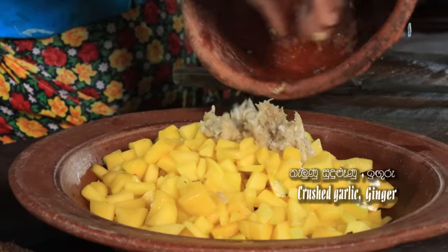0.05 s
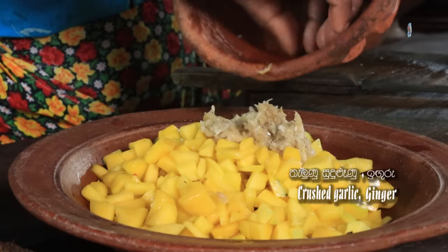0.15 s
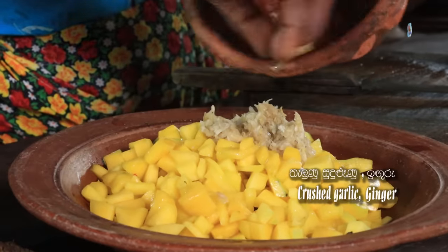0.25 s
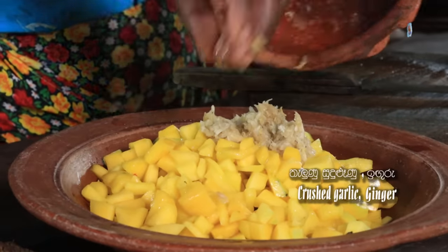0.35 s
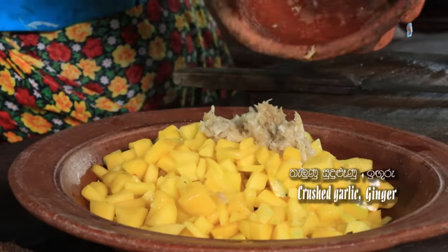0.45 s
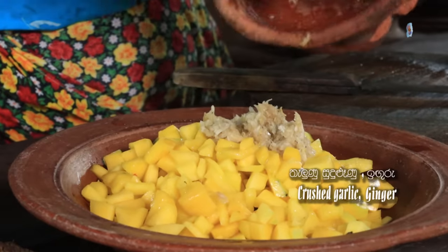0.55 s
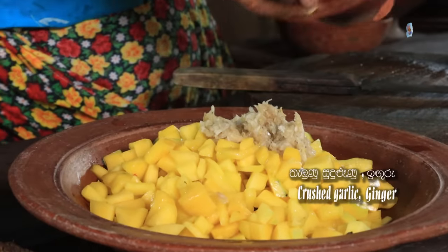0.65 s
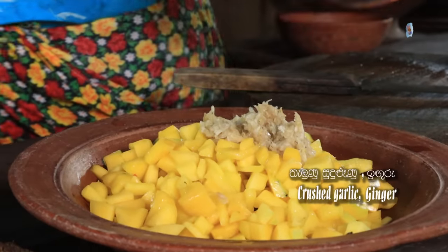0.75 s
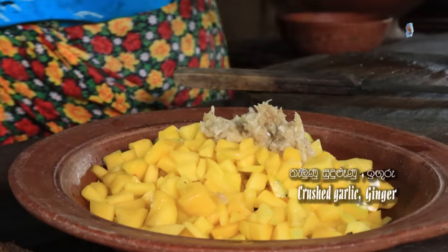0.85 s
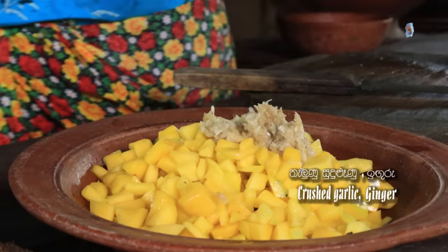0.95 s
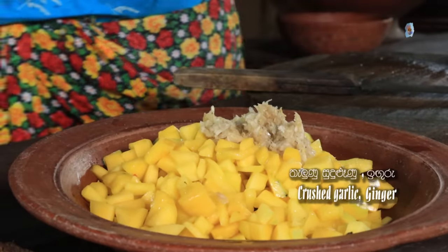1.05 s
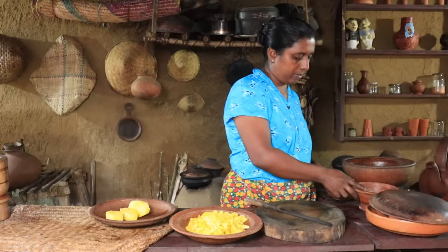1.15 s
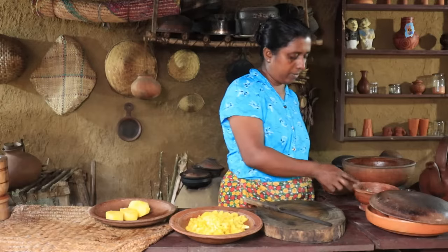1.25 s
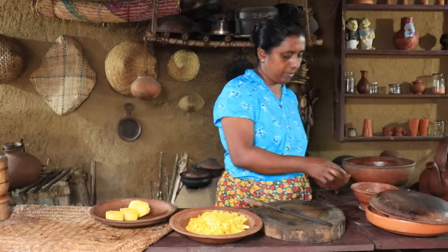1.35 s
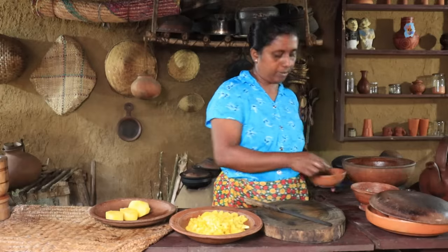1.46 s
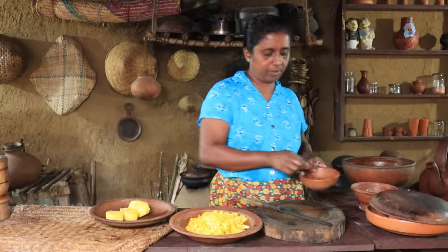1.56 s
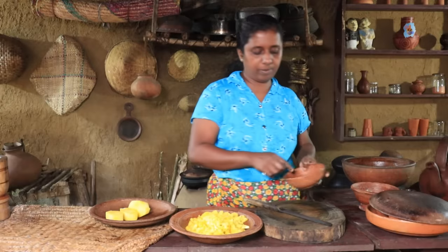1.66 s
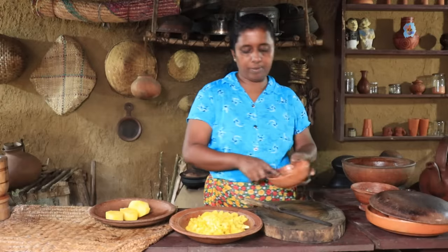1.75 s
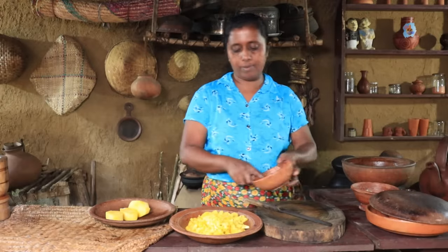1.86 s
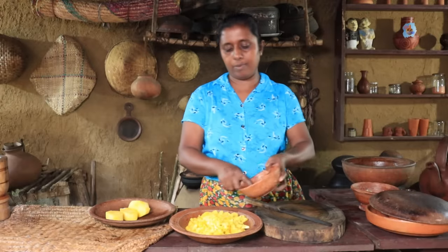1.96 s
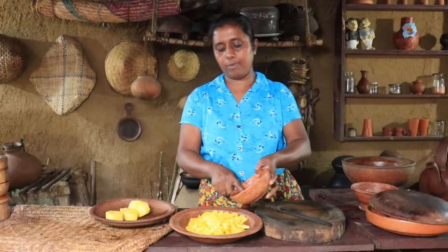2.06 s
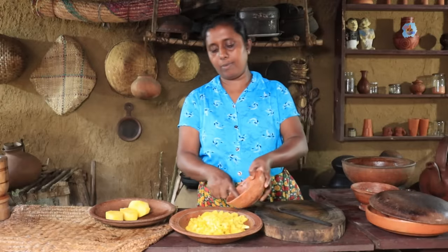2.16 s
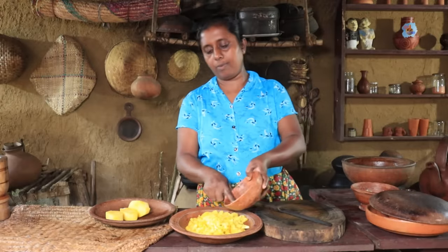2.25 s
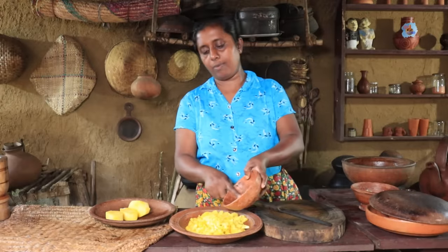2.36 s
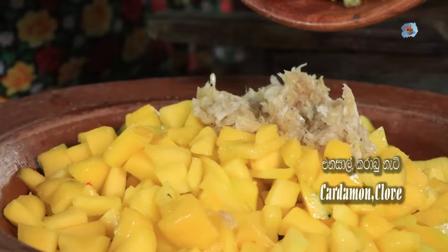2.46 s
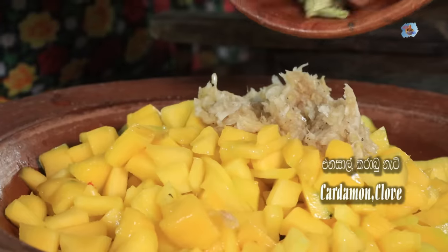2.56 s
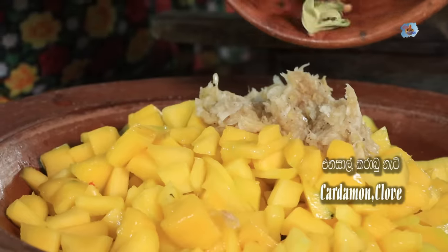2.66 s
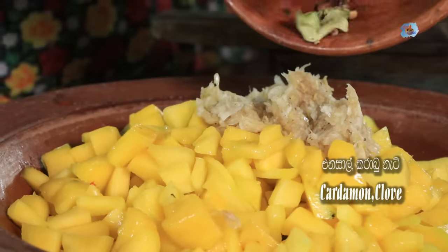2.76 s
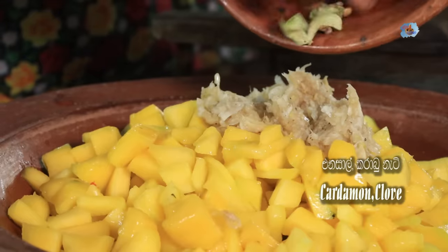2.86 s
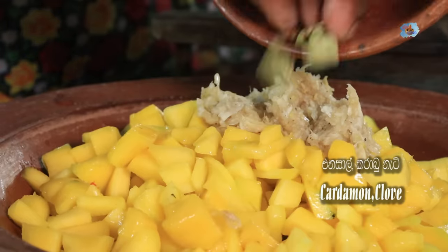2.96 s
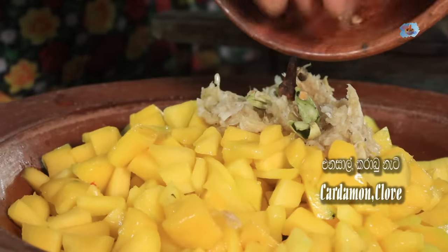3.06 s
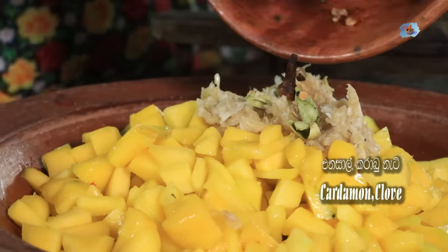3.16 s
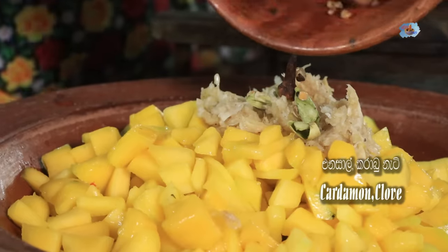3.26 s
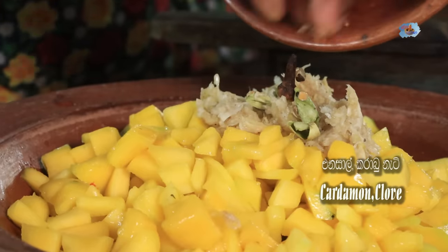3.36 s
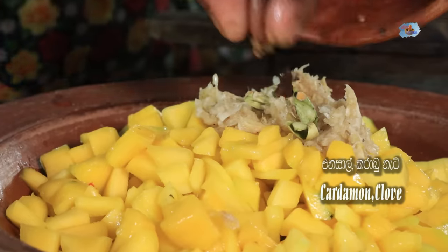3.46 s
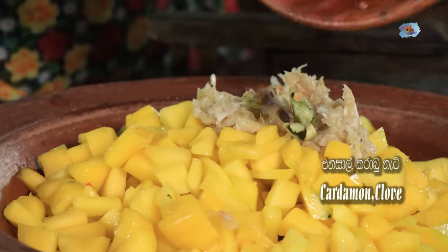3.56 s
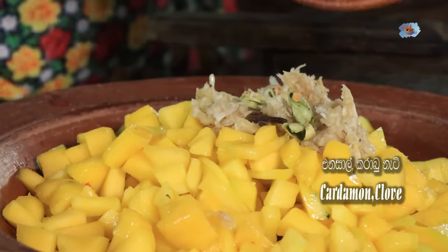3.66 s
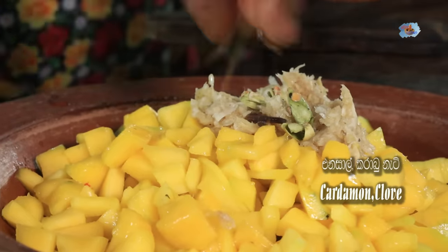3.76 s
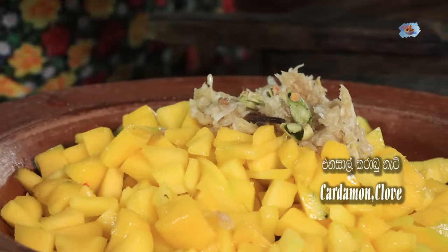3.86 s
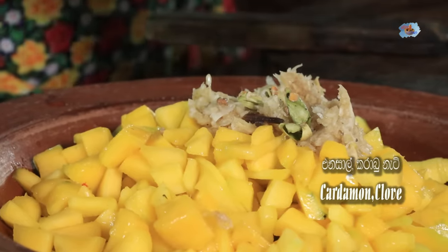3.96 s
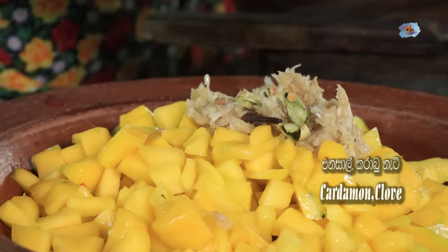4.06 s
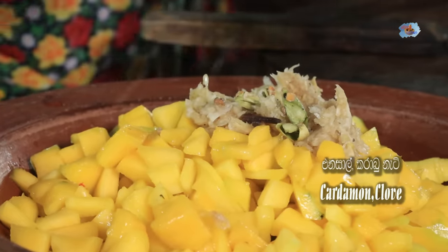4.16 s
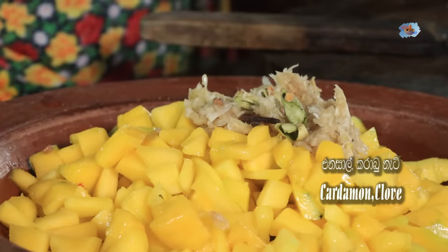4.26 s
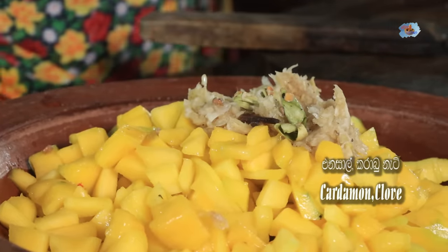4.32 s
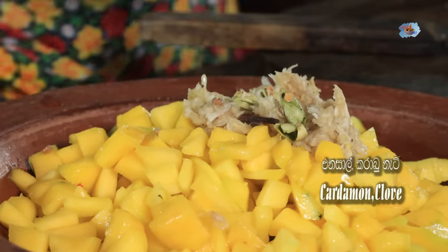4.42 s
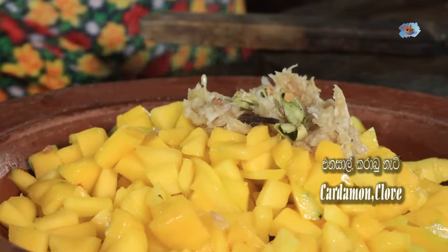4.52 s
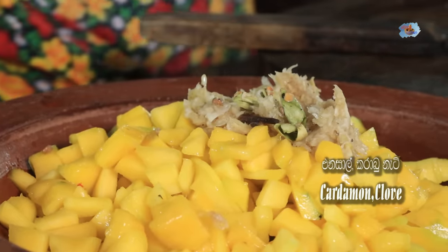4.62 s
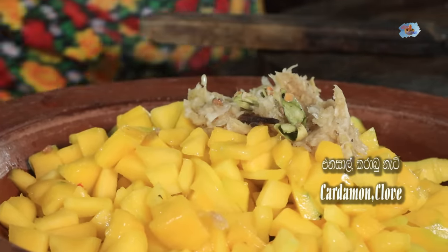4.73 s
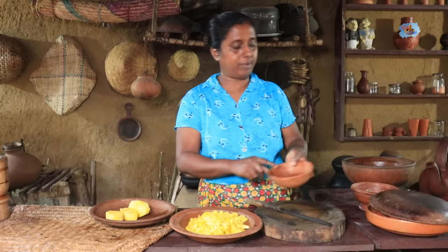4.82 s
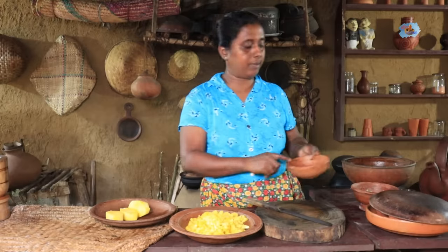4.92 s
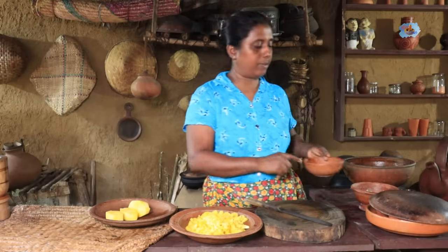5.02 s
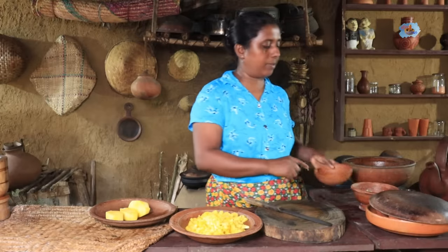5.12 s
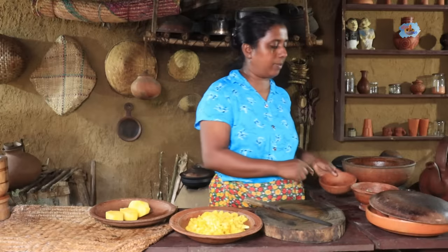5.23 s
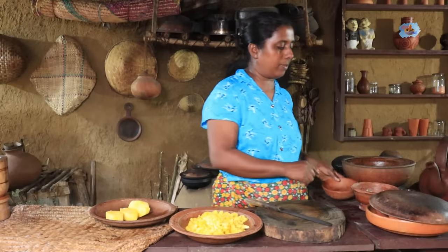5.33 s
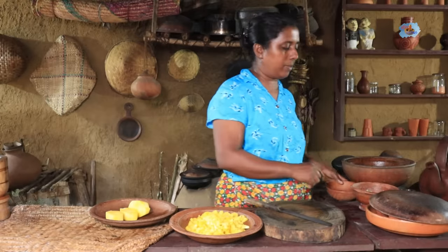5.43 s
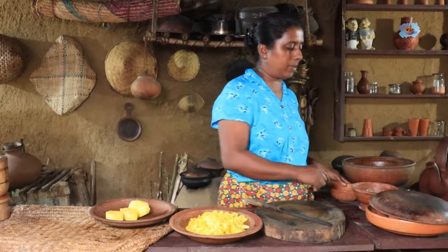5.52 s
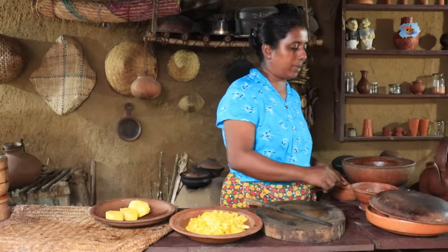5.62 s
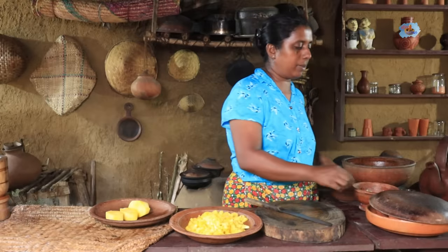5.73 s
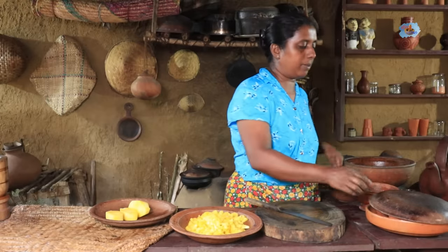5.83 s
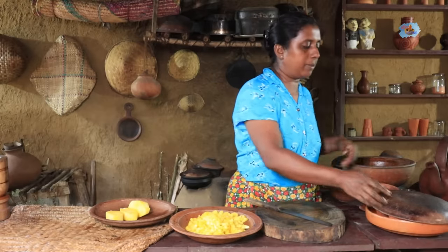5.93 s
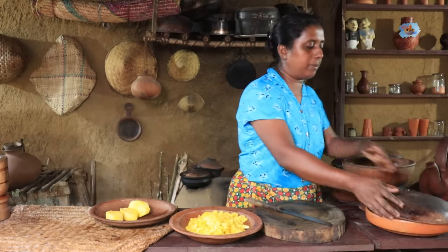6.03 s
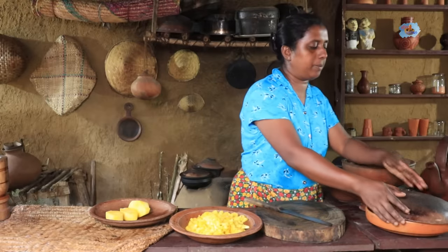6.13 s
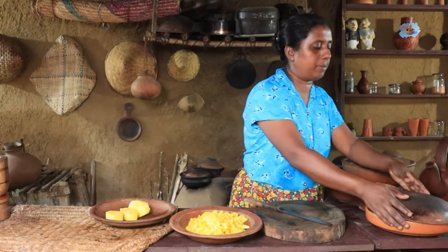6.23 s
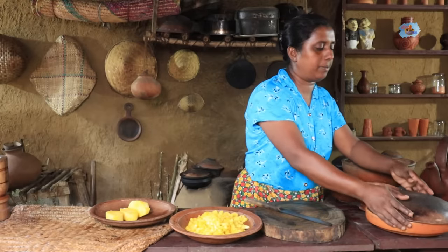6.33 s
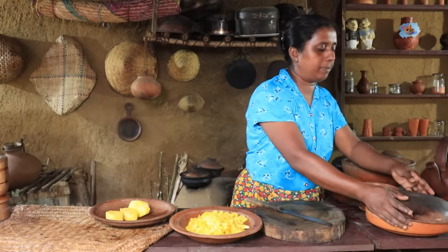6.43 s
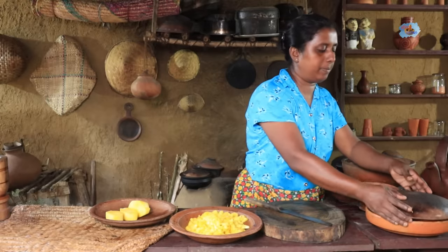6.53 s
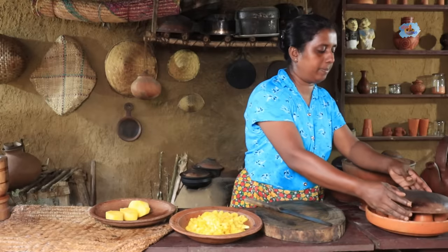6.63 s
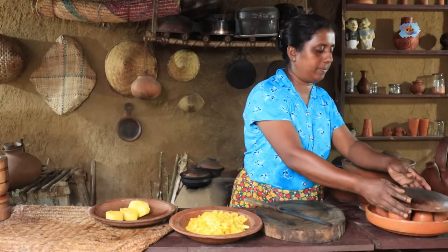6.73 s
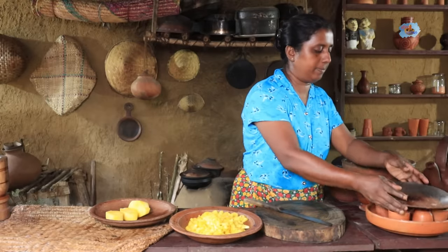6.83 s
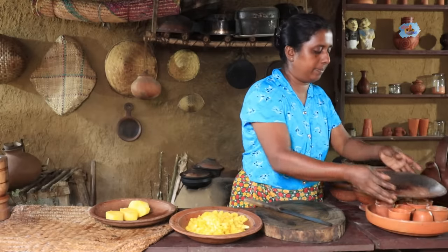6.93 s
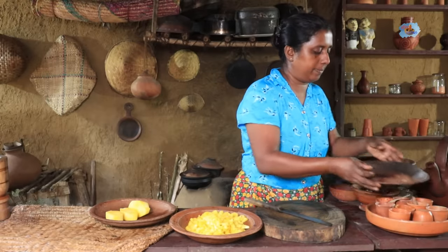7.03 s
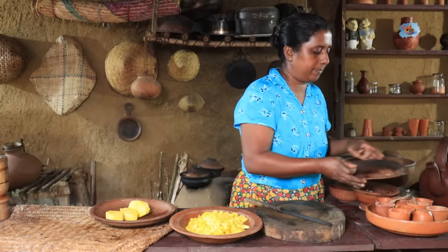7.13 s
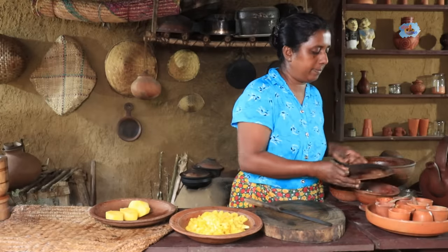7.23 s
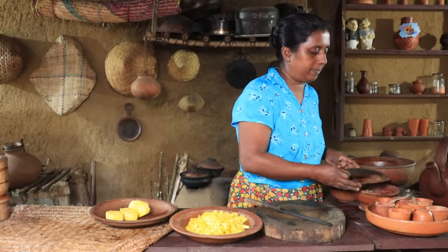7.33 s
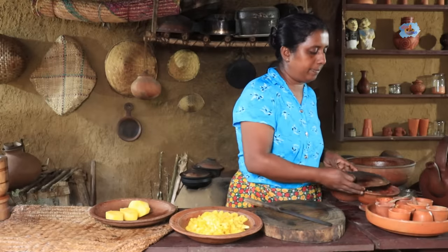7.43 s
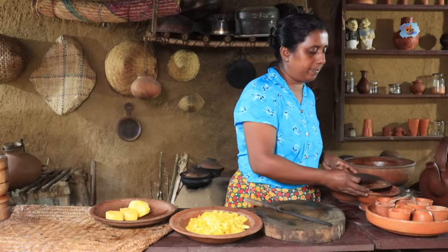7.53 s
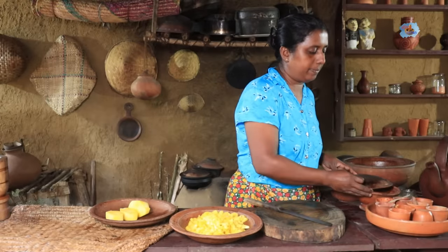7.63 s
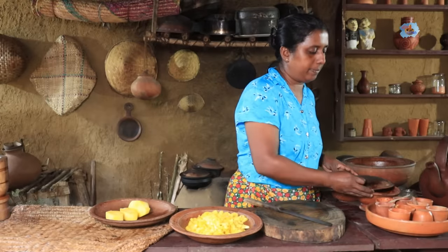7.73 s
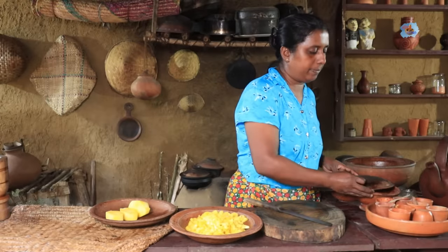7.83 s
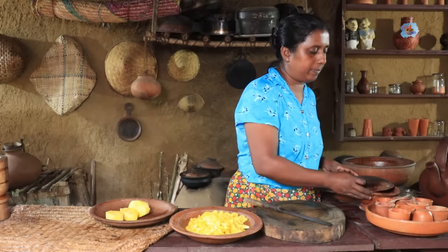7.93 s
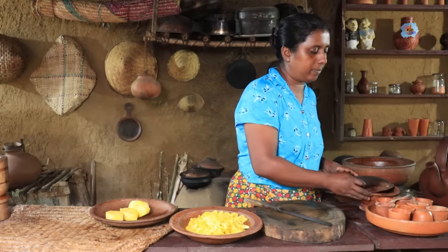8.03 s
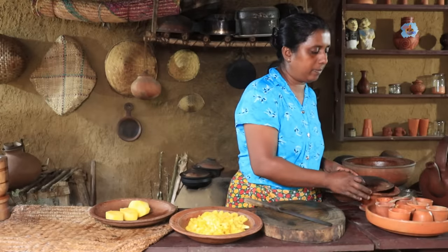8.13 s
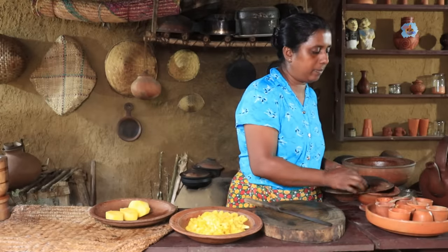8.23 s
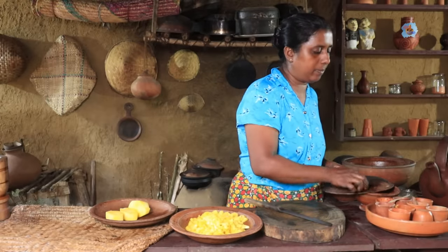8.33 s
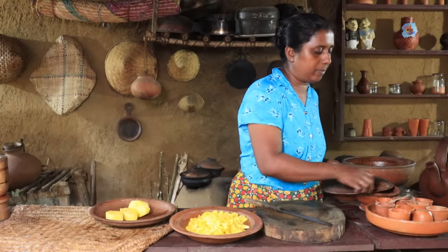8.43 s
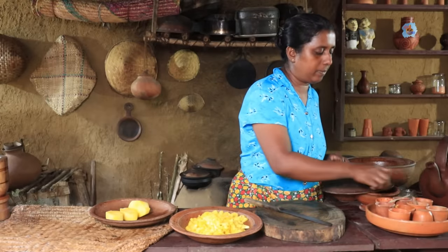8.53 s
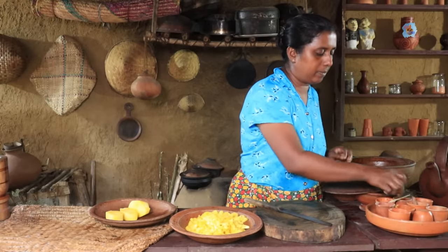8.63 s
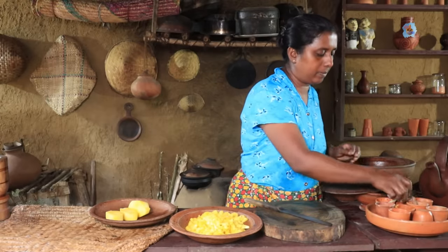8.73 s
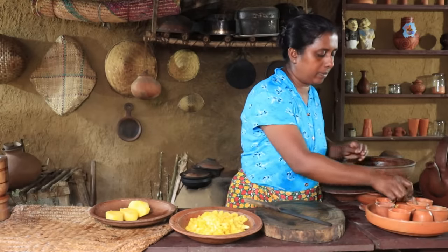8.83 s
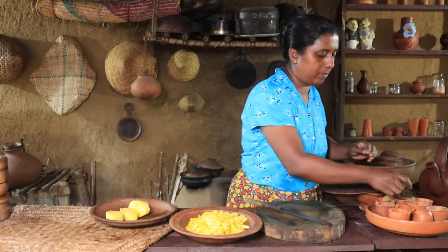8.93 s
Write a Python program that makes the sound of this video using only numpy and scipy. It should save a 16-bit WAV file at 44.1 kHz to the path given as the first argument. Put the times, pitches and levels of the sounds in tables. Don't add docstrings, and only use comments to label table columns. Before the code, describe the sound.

Very quiet dry rubs, grit and tiny bright clicks of clay come first, with distant bird whistles. Past the middle, loud hollow double knocks of a bowl being set down, a short rattling lid removal, a pause, then the lid lands edge first and drops flat. A loud nearby chirp on the left just precedes the landing. Small room with short echo, soft insect band and motor hum, close spaced microphones.

```python
import sys
import numpy as np
from scipy import signal
from scipy.fft import rfft, irfft, next_fast_len
from scipy.io import wavfile
from scipy.ndimage import map_coordinates

SR = 44100
rng = np.random.default_rng(int(sys.argv[2]) if len(sys.argv) > 2 else 0)


def pcm_store(signal):
    levels = np.round(np.clip(np.atleast_2d(signal), -1, 1) * 32767)
    wavfile.write(sys.argv[1], SR, levels.astype(np.int16).T)


def gain_from_db(level_db):
    decades = np.asarray(level_db, float) / 20
    return 10 ** decades


N = 396018
TIME = np.arange(N) / SR

# f/Hz, level/dB, t60/s
LID_ON_PAN = [(187, -14, 0.26), (303, 2.5, 0.095), (365.5, 4, 0.22), (499, 4, 0.15), (595, -0.5, 0.21),
              (750, -3, 0.1), (1020, -1, 0.08), (1117, -3, .2), (1170, -6.5, 0.21), (1360, -6, .25),
              (1620, -5.5, .14), (2210, -12, .1), (2484, -14, 0.16), (3050, -21, 0.11)]
# f/Hz, t60/s
KITCHEN = [(120, 0.46), (400, 0.27), (1500, 0.27), (4000, 0.098), (12000, 0.042)]


def unit(x):
    return x / np.sqrt(np.mean(x ** 2) + 1e-20)


def along(points, hz):
    f, v = np.transpose(points)
    return np.interp(np.log(hz + 1), np.log(f + 1), v)


def wobble(rate_hz):
    knots = rng.standard_normal(int(N * rate_hz / SR) + 4)
    return map_coordinates(knots, [TIME * rate_hz])


def filtered(x, response):
    m = next_fast_len(x.shape[-1] + SR // 4)
    spectrum = rfft(x, m) * response(np.fft.rfftfreq(m, 1 / SR))
    return irfft(spectrum, m)[..., :x.shape[-1]]


def resonant(peaks):
    def response(f):
        total = 0
        for k, (centre, width, db) in enumerate(peaks):
            peak = 1j * f * width / (centre * centre - f * f + 1j * f * width)
            total = total + (-1) ** k * gain_from_db(db) * peak
        return total
    return response


def diffuse(size, alike):
    def mid_side(hz):
        angle = np.arccos(np.clip(along(alike, hz), -1, 1)) / 2
        return np.array([np.cos(angle), np.sin(angle)])
    mid, side = filtered(rng.standard_normal((2, size)), mid_side)
    return np.array([mid + side, mid - side])


def echoes(x, decay, gap_s):
    # f/Hz, likeness/1
    alike = [(60, .99), (400, 0.98), (900, 0.42), (2000, 0.067), (6000, 0.097)]
    hz, t, z = signal.stft(diffuse(SR * 3 // 4, alike), SR, nperseg=256)
    tail = signal.istft(z * gain_from_db(-60 * t / along(decay, hz)[:, None]), SR, nperseg=256)[1]
    tail = np.pad(tail / np.linalg.norm(tail[0]), ((0, 0), (round(gap_s * SR), 0)))
    return signal.fftconvolve(x[None], tail, axes=1)[:, :N]


def ports(x, lag_s, pan_db):
    half = np.array([[.5], [-.5]])

    def response(hz):
        direct = np.exp(-2j * np.pi * hz * lag_s * half)
        bounce = gain_from_db(-31) * np.exp(-2j * np.pi * hz * (0.001286 + 0.13 * lag_s * half))
        return gain_from_db(pan_db * half) * (direct + bounce)
    return filtered(x, response)


def add(track, s, sound):
    part = track[max(round(s * SR), 0):][:len(sound)]
    part += sound[:len(part)]


def pressure(rows, order, rise, lift_s):
    out = np.zeros(N)
    for row in rows:
        length = row[1]
        t = TIME[:round(length * SR)]
        ramp = np.minimum(t / (rise * length), (length - t) / min(lift_s, length))
        add(out, row[0], gain_from_db(row[order]) * np.clip(ramp, 0, 1))
    return out


def grains(spiky_db, clump_db):
    level_db = spiky_db * rng.exponential(size=N) + clump_db * wobble(150)
    return gain_from_db(level_db) * rng.standard_normal(N)


def strokes():
    # t/s, length/s, skin hiss level/dB, grit level/dB
    rubs = [(0, 0.014, -47.5, -42.5), (.243, 0.025, -52, -46), (.29, 0.12, -50, -50.5),
            (.747, 0.045, -49, -48.5), (.91, 0.087, -75, -62.5), (2.47, 0.13, -74, -63.5),
            (2.535, 0.071, -60, -76), (2.59, .11, -61.5, -60.5), (2.928, 0.11, -54, -59),
            (3.015, 0.069, -47.5, -55), (3.324, 0.037, -52, -51.5), (3.38, 0.124, -48.5, -52),
            (4.122, 0.052, -52, -50.5), (4.16, 0.096, -60, -60), (5.81, 0.13, -70, -55.5),
            (6.55, 0.13, -54.5, -50), (7.672, 0.046, -68, -45), (7.8, 0.11, -61, -52)]
    # f/Hz, density/dB
    skin_colour = [(4000, -43), (6000, -4), (8500, -0.5), (12000, -7.5), (15600, -4)]
    # f/Hz, density/dB
    grit_colour = [(300, 9), (600, 5.5), (1500, 3), (3500, 3), (6000, 1), (8000, -19.5)]
    rise, lift_s = 0.17, 0.032
    skin = filtered(grains(spiky_db=-0.5, clump_db=2.0), lambda hz: gain_from_db(along(skin_colour, hz)))
    grit = filtered(grains(spiky_db=2.5, clump_db=2.5), lambda hz: gain_from_db(along(grit_colour, hz)))
    hiss = pressure(rubs, 2, rise, lift_s) * unit(skin)
    return hiss + pressure(rubs, 3, rise, lift_s) * unit(grit)


def spoon():
    # t/s, length/s, level/dB
    scrapes = [(2.929, .042, -47), (2.968, .02, -54), (3.02, .05, -60), (3.323, .04, -45.5),
               (3.385, .08, -58), (3.47, .035, -52), (4.125, .028, -54)]
    dish = resonant([(4250, 200, 0), (5680, 200, 2.5), (6950, 220, -3), (8200, 260, -3)])
    chatter = filtered(grains(spiky_db=2, clump_db=1.5), lambda hz: dish(hz) ** 2)
    return pressure(scrapes, order=2, rise=.03, lift_s=0.038) * unit(chatter)


def ticks():
    # t/s, peak/dB, f/Hz, broad part/dB
    snaps = [(0.111, -46.5, 8500, -8), (0.247, -35, 3300, -10), (0.388, -29, 4800, -16),
             (0.748, -41.5, 2740, -23), (0.998, -41, 1070, -26), (1.189, -29, 14500, -6.5),
             (2.413, -41.5, 5600, -10.5), (2.545, -37, 12600, -11.5), (2.556, -33, 12000, -31),
             (2.97, -38, 5750, -23), (3.023, -35, 6400, 13), (3.157, -48.5, 9000, -30),
             (3.376, -39, 4020, -24), (3.374, -31, 5740, -13.5), (3.428, -40, 6960, -8.5),
             (3.489, -38, 8100, -22.5), (3.998, -56, 2310, -9), (4.101, -37, 4200, -13),
             (4.144, -38, 2170, -4.5), (4.213, -41.5, 5570, -7), (6.586, -40.5, 7400, -10),
             (7.688, -39.5, 3340, -21)]
    # t/s, level/dB, f/Hz, t60/s
    taps = [
        (0.747, -48, 462, 0.16),
        (.748, -43.5, 804, 0.041),
    ]
    out, t = np.zeros(N), TIME[:SR // 4]
    for s, db, hz, broad_db in snaps:
        t60_s = 0.02 * (4000 / hz) ** 0.37
        snap = gain_from_db(-60 * t / t60_s) * rng.standard_normal(len(t))
        snap = filtered(snap, resonant([(hz, 0.17 * hz, 0), (6000, 8000, broad_db)]))
        add(out, s, gain_from_db(db) * snap / np.abs(snap).max())
    for s, db, hz, t60_s in taps:
        add(out, s, gain_from_db(db - 60 * t / t60_s) * np.sin(2 * np.pi * hz * t))
    return out


def hands():
    out = strokes() + spoon() + ticks()
    return ports(out, lag_s=.00001, pan_db=-1.5) + gain_from_db(-7) * echoes(out, KITCHEN, gap_s=.004)


def whistles(calls, waver, trill):
    out = np.zeros(N)
    for s, length, from_hz, to_hz, db in calls:
        t = TIME[:round(length * SR)]
        pitch = to_hz + (from_hz - to_hz) * np.exp(-8 * t / length)
        pitch = pitch * (1 + waver[round(s * SR):][:len(t)])
        swell = np.sin(np.pi * t / length) ** .5
        swell = swell * (1 - trill * np.cos(np.pi * 112 * t) ** 2)
        add(out, s, gain_from_db(db) * swell * np.sin(2 * np.pi * np.cumsum(pitch) / SR))
    return out


def birds():
    # t/s, length/s, from f/Hz, to f/Hz, level/dB
    near_notes = [
        (0, 0.042, 2210, 1964, -37.5),
        (1.35, 0.1, 1200, 1200, -45.5),
        (7.488, 0.031, 1170, 960, -38.5),
        (7.523, 0.027, 900, 1300, -37.5),
        (7.548, 0.041, 1930, 2033, -25.5),
        (7.55, 0.039, 1020, 1050, -42),
        (7.555, 0.067, 3000, 3050, -49),
    ]
    near_trill = [
        (7.425, 0.063, 1470, 1740, -32),
    ]
    far_notes = [(0.57, 0.12, 3250, 2860, -52), (0.825, 0.16, 2830, 2550, -58.5),
                 (1.216, 0.023, 1570, 1650, -48.5), (1.63, 0.14, 2800, 3280, -50.5),
                 (2.05, 0.095, 2040, 2037, -60), (2.21, 0.16, 3700, 5430, -52.5),
                 (3.502, 0.11, 2900, 2750, -60), (4.165, 0.16, 4320, 5320, -52),
                 (5.09, 0.12, 2850, 3500, -48.5), (7.154, 0.067, 1666, 1590, -51),
                 (7.84, 0.14, 4670, 5540, -56)]
    far_trills = [
        (3.88, 0.14, 3430, 3800, -57),
        (4.865, .12, 2750, 2580, -50),
        (4.96, 0.3, 2500, 2370, -51.5),
    ]
    # f/Hz, t60/s
    garden = [(1000, 0.68), (2000, 0.91), (6000, 0.7)]
    near_waver, far_waver = .009 * wobble(88), .012 * wobble(200)
    near = whistles(near_notes, near_waver, trill=0.5)
    near = near + whistles(near_trill, 4.4 * near_waver, trill=0.97)
    far = whistles(far_notes, far_waver, trill=0.1)
    far = far + whistles(far_trills, 3.5 * far_waver, trill=.7)
    far = far * (1 + .5 * wobble(900))
    out = ports(near, lag_s=-0.00017, pan_db=7) + gain_from_db(-4.5) * echoes(near, garden, gap_s=0.015)
    return out + echoes(far, garden, gap_s=0.000966)


def room_air():
    # f/Hz, density/dB
    colour = [(15, -57), (25, -17.5), (70, 1), (170, -6), (503, -8.5), (2000, -14), (9070, -26),
              (16000, -29.5)]
    # f/Hz, likeness/1
    alike = [(60, 1), (180, 0.66), (550, 0.49), (1650, 0.014), (4970, 0.053), (15000, 0.02)]
    air = filtered(diffuse(N, alike), lambda hz: gain_from_db(along(colour, hz)))
    return unit(air) * gain_from_db(-51.5 + .5 * wobble(8))


def insects():
    band = resonant([(6905, 510, 0)])
    song = filtered(rng.standard_normal((2, N)), lambda hz: band(hz) ** 2)
    return unit(song) * gain_from_db(-67 + .8 * wobble(10.0))


def motor_hum():
    # t/s, length/s, level/dB
    loud_spans = [
        (0, 1.16, -56),
        (2.39, 2.55, -57),
    ]
    phase = 2 * np.pi * np.cumsum(190.5 + 1.25 * wobble(20)) / SR
    level = np.maximum(gain_from_db(-63.5), pressure(loud_spans, order=2, rise=.015, lift_s=0.018))
    hum = level * gain_from_db(0.63 * wobble(2.805)) * np.sin(phase)
    return hum + gain_from_db(-67.0 + 0.5 * wobble(1.2)) * np.sin(2 * phase)


def crows():
    # t/s, length/s, level/dB
    caws = [
        (1.2, 0.36, -56),
        (1.4, 0.57, -52),
        (6.03, 0.65, -51),
        (6.86, 0.53, -52.5),
    ]
    beak = resonant([(1270, 470, 4.5), (1690, 1270, -2)])
    pitch_hz = 410 * (1 + 0.026 * wobble(40))
    cycle = np.cumsum(pitch_hz) / SR
    pulses = np.diff(np.floor(cycle), prepend=0) * gain_from_db(3.5 * rng.standard_normal(N))
    hoarse = unit(pulses) + 3 * rng.standard_normal(N)
    voice = unit(filtered(hoarse, lambda hz: beak(hz) ** 2))
    call = pressure(caws, order=2, rise=0.045, lift_s=0.33) * voice
    return gain_from_db(-3.5) * echoes(call, [(1000, 0.18), (2000, 0.1)], gap_s=0.00095)


def squeezed(t, ring):
    # from f/Hz, to f/Hz, closing time/s, level/dB, t60/s
    pocket = (416.5, 495, 0.029, 0.55, 0.36)
    from_hz, to_hz, closing_s, db, t60_s = pocket
    pitch = from_hz + (to_hz - from_hz) * np.clip(t / closing_s, 0, 1)
    return -gain_from_db(db - 60 * t / (ring * t60_s)) * np.sin(2 * np.pi * np.cumsum(pitch) / SR)


def knocks(blows, modes, lag_s, pan_db, wet_db, clack_db, settle_s, choke_db, footed=False):
    out, t = np.zeros(N), TIME[:SR // 2]
    hz, level, t60_s = np.transpose(modes)[:, :, None]
    t60_s = np.minimum(t60_s, .4 * (300 / hz) ** .6)
    choke = gain_from_db(choke_db * np.clip((t - settle_s) / 0.008, 0, 1))
    for s, db, tilt_db, ring, crack_db in blows:
        strength = level + tilt_db * np.log2(hz / 500) + rng.normal(0, 1, hz.shape)
        decay = gain_from_db(strength - 60 * t / (0.98 * ring * t60_s))
        tones = (decay * np.sin(-2 * np.pi * hz * t)).sum(0)
        if footed:
            tones = tones + squeezed(t, ring)
        clack = gain_from_db(-60 * t / (.15 * ring)) * rng.standard_normal(len(t))
        small_modes = np.c_[hz, .12 * hz, strength - 7 * np.log2(1 + hz / 1500)]
        clack = filtered(clack, resonant(small_modes))
        crack = gain_from_db(-60 * t / 0.03) * rng.standard_normal(len(t))
        crack = filtered(crack, resonant([(3000, 6300, 0.027)]))
        blow = tones / np.abs(tones).max() + gain_from_db(clack_db) * clack / np.abs(clack).max()
        blow = blow + gain_from_db(crack_db) * crack
        add(out, s, gain_from_db(db) * blow * choke * (1 - np.exp(-t / .0006)))
    out = filtered(out, lambda f: (1j * f / (1j * f + 88)) ** 4)
    out = filtered(out, lambda f: (1 + 1j * f / 5000) ** -3)
    return ports(out, lag_s, pan_db) + gain_from_db(wet_db) * echoes(out, KITCHEN, gap_s=.006)


def bowl():
    # f/Hz, level/dB, t60/s
    modes = [(189, -14, .45), (262, -13, .3), (297, -3.5, .5), (335, -5, .2), (392, -9, .25),
             (578, -18, .3), (761, -12, .28), (882, -21, .2), (945, -21, .25), (1052, -12, .18),
             (1292, -19, .15), (1550, -23, .12), (3290, -27, .09), (4290, -19, .08)]
    # t/s, peak/dB, tilt/(dB/octave), ring time factor/1, crack/dB
    touch = [
        (5.49, 1, -0.33, 0.67, -17),
    ]
    down = [
        (5.6225, 1.5, -0.5, 0.65, -26.5),
    ]
    rock = [
        (5.749, -7.5, -2.5, .7, -17.5),
        (5.798, -2.5, -3, 0.77, -34),
        (5.828, -19, -6.5, 0.23, -15),
        (6.16, -28, -7.5, 0.36, -33),
    ]
    return (knocks(touch, modes, .00008, -.9, wet_db=-12, clack_db=-13, settle_s=.046, choke_db=-10, footed=True)
            + knocks(down, modes, .00007, 0.0, wet_db=-12, clack_db=-13, settle_s=.047, choke_db=-11, footed=True)
            + knocks(rock, modes, .00007, -0.5, wet_db=-9.5, clack_db=-9, settle_s=0.035, choke_db=-15.5,
                     footed=True))


def lid_drag():
    # t/s, length/s, level/dB
    slides = [
        (6.55, 0.084, -40.5),
        (6.598, 0.057, -28),
    ]
    peaks = [(hz, 30 + 0.018 * hz, db + 0.1 * np.log2(hz / 500)) for hz, db, _ in LID_ON_PAN]
    rough = unit(filtered(grains(spiky_db=5.5, clump_db=5), resonant(peaks)))
    out = pressure(slides, order=2, rise=0.33, lift_s=0.04) * rough
    return ports(out, lag_s=.0001, pan_db=0.0) + gain_from_db(-1) * echoes(out, KITCHEN, gap_s=0.0057)


def lid_knocks():
    # f/Hz, level/dB, t60/s
    tilted = [(127, -18, 0.34), (200, -10.5, 0.27), (265, -3, .2), (359.5, -4, 0.24), (447, -5, 0.24),
              (581, 3.5, 0.13), (663, 2.5, 0.16), (815, -2.5, 0.11), (984, -7, 0.13), (1200, -8, 0.077),
              (1855, -3, 0.14), (2330, -10.5, .13), (3220, -5.5, .1), (3960, -37, .1)]
    flat = [(89, -19, 0.45), (129, -17.5, 0.37), (187.5, -6.5, .3), (263.4, 0.5, 0.26), (338, -3.5, 0.24),
            (462, -1, 0.15), (582, -4, 0.22), (617, -10.5, 0.18), (770, -7.5, 0.24), (976, -9.5, .15),
            (1137, -13, .12), (1300, -22, .09), (1760, -16.5, 0.083), (3180, -32.5, .07)]
    # t/s, peak/dB, tilt/(dB/octave), ring time factor/1, crack/dB
    up = [
        (6.67, -11.5, 0.5, 0.72, -13),
        (6.707, -5, 6, 0.23, -14),
        (6.724, 0, 7.5, 0.34, -10.5),
        (6.748, -5.5, -7.5, 0.36, -39),
    ]
    down = [
        (7.68, -14, -6, 0.53, -35),
        (7.775, -5, -7.5, 0.3, -15),
        (7.797, -2.5, -1, 0.29, -13),
    ]
    drop = [
        (8.055, -1, -1.5, 0.21, -17.5),
        (8.0595, -7.5, 0.5, 0.73, -11),
        (8.2, -37.5, 7, 0.91, 8),
        (8.568, -40, 17, 0.57, -12),
    ]
    return (knocks(up, LID_ON_PAN, .00008, 0.4, wet_db=-9.5, clack_db=-8, settle_s=0.074, choke_db=-5)
            + knocks(down, tilted, .00008, -1.0, wet_db=-8.0, clack_db=-6, settle_s=0.044, choke_db=0)
            + knocks(drop, flat, .00008, -0.5, wet_db=-13.0, clack_db=-3.5, settle_s=0.038, choke_db=3.5))


def scene():
    background = room_air() + insects() + motor_hum()
    return hands() + birds() + background + crows() + bowl() + lid_drag() + lid_knocks()


def top_cut(x):
    return signal.sosfilt(signal.butter(12, 16800, fs=SR, output="sos"), x)


def record(dry):
    mix = filtered(dry, lambda hz: hz < 15830)
    return top_cut(mix)


dry = scene()
out = record(dry)
pcm_store(out)
```